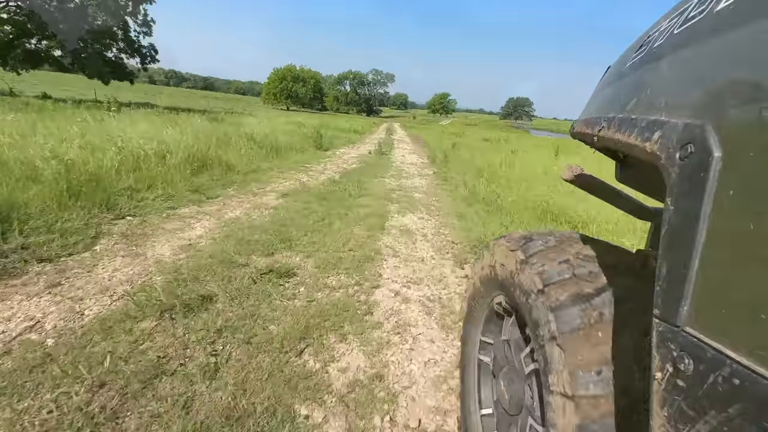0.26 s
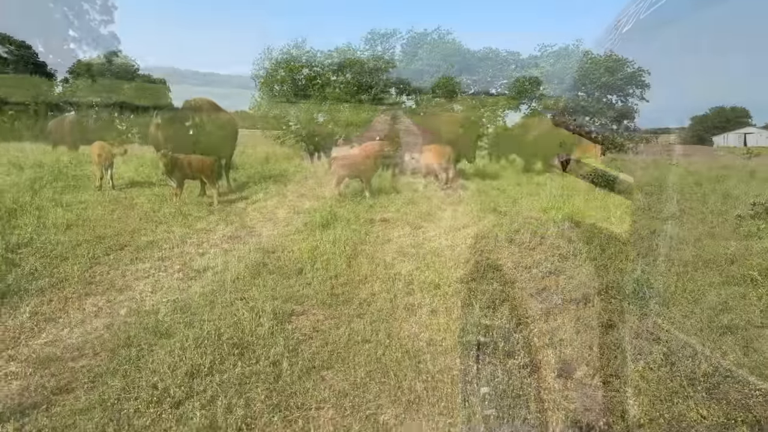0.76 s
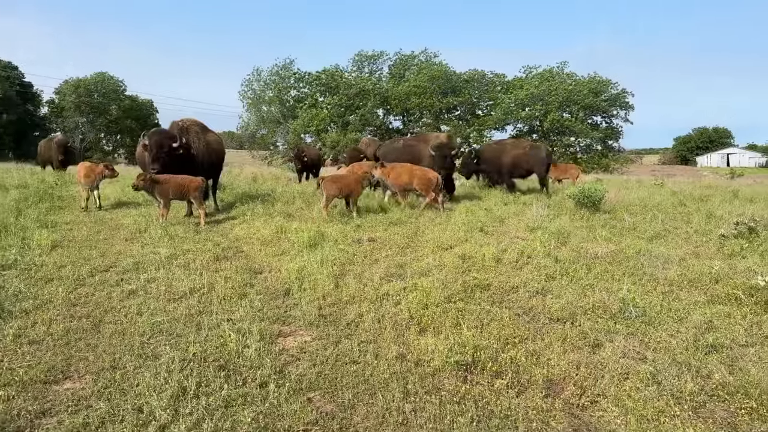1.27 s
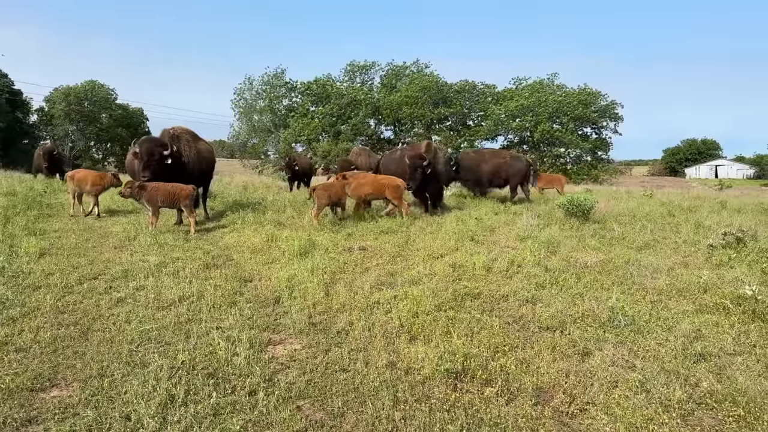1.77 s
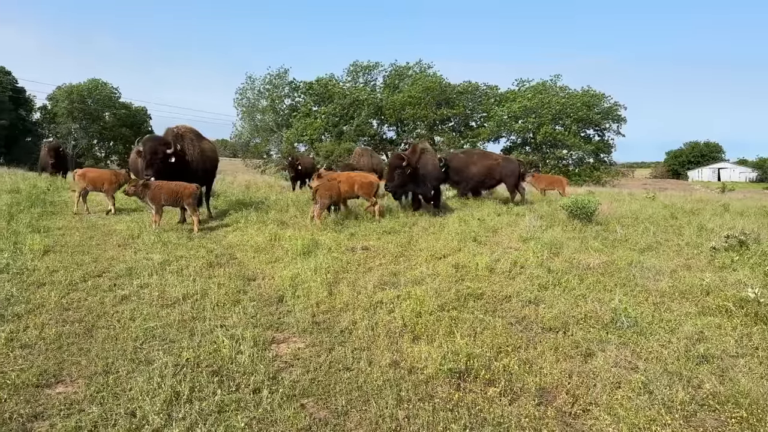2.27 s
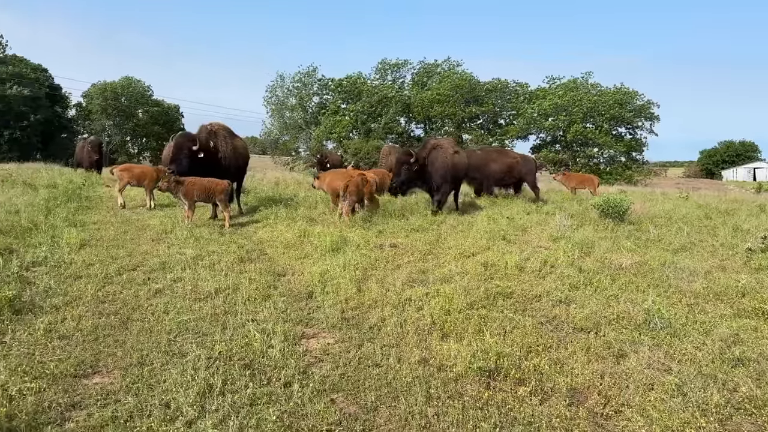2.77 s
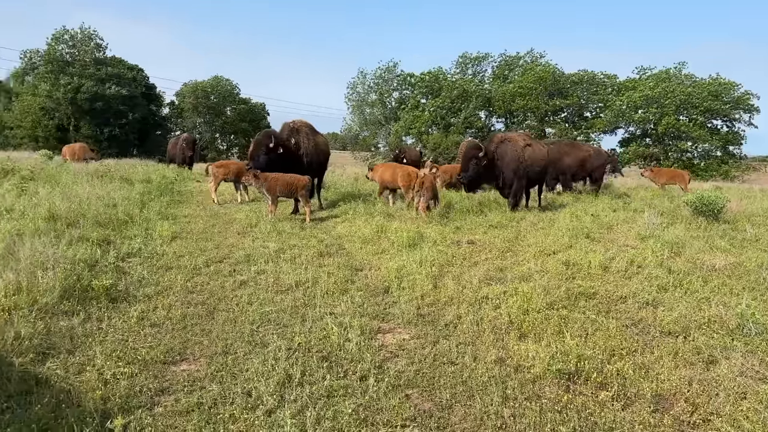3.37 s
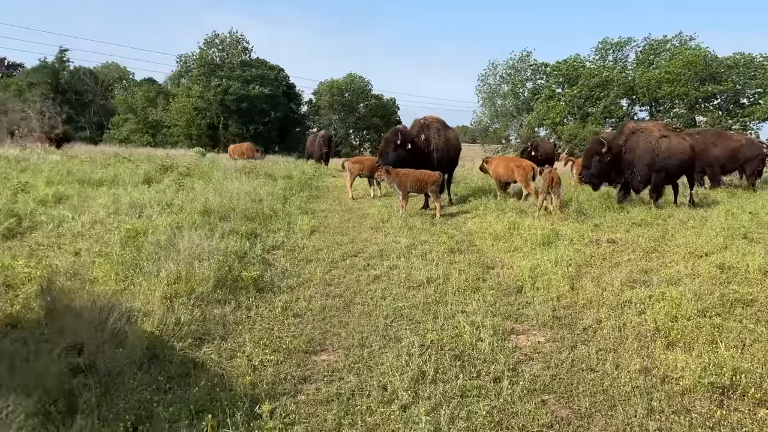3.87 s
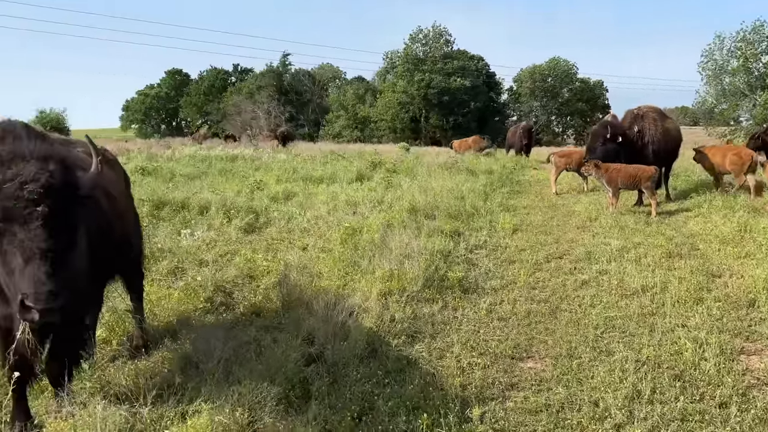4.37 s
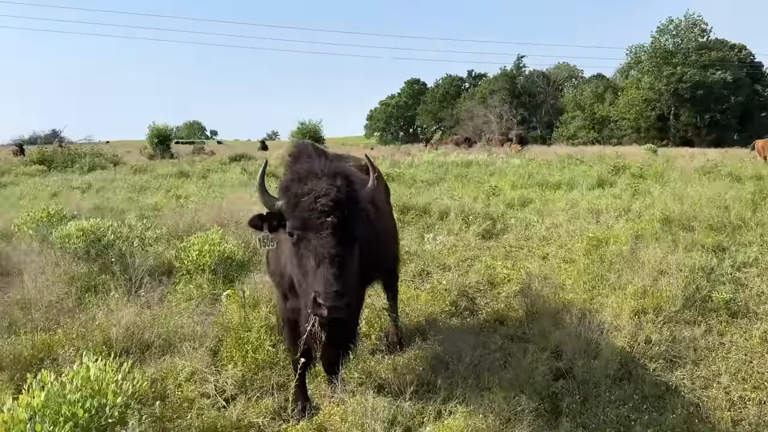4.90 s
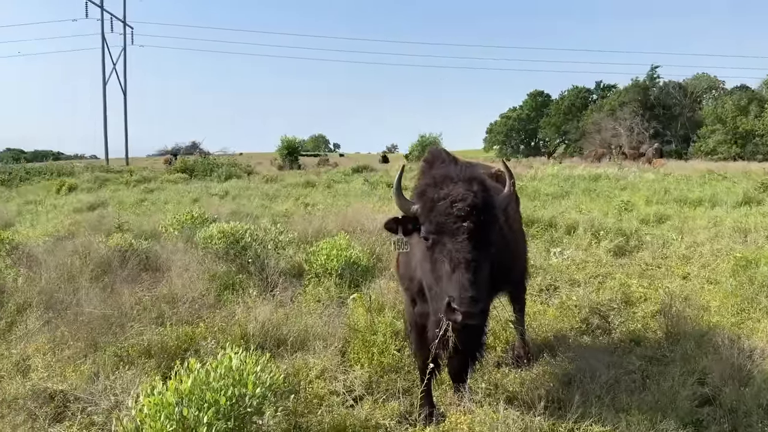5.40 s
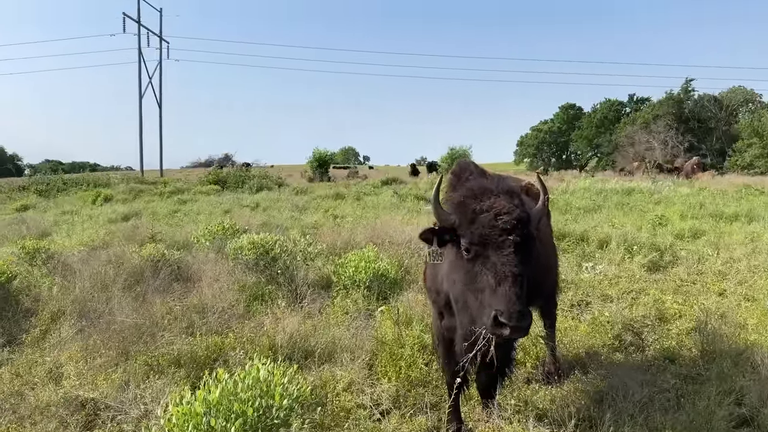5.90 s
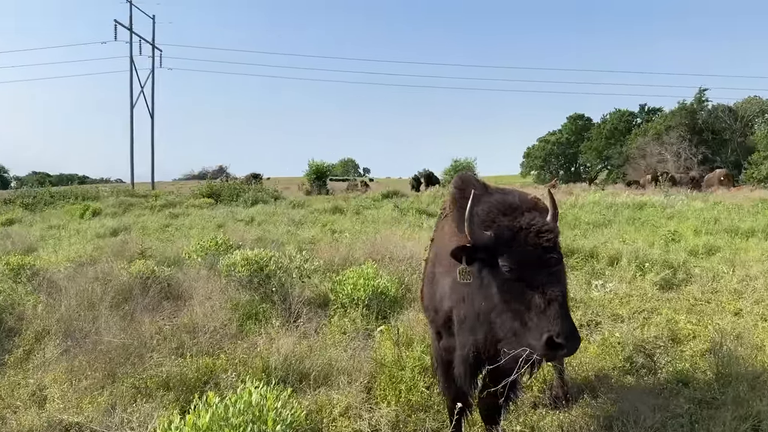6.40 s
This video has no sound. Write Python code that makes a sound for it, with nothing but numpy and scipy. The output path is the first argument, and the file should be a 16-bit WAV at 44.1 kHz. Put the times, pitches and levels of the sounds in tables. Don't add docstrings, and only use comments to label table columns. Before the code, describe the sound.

A small off-road vehicle rattles along in buffeting wind, fades within a second, then bison give low pulsing grunts close by in a quiet pasture.

```python
import sys
import numpy as np
from scipy import signal
from scipy.fft import rfft, irfft, next_fast_len
from scipy.io import wavfile
from scipy.ndimage import uniform_filter1d

SR = 44100
rng = np.random.default_rng(int(sys.argv[2]) if len(sys.argv) > 2 else 0)


def digitize_waveform(pressure):
    field = np.atleast_2d(pressure).T
    bounded = np.clip(field, -1, 1)
    quanta = np.round(bounded * 32767).astype(np.int16)
    wavfile.write(sys.argv[1], SR, quanta)


def nominal_scale(level):
    x = np.asarray(level, float) / 20
    return 10 ** x


N = 293265


def unit(x):
    return x / np.sqrt(np.mean(x ** 2) + 1e-20)


def span(rows):
    s, *columns = np.transpose(rows)
    first = round(s[0] * SR)
    t = np.arange(first, min(N, round(s[-1] * SR))) / SR
    return first, [np.interp(t, s, c) for c in columns]


def at_hz(points, hz):
    table_hz, values = np.array(points).T
    return np.interp(np.log(hz), np.log(table_hz), values)


def add(out, start, x):
    out[..., start:start + x.shape[-1]] += x[..., :N - start]


def drift(rate, size):
    knots_hz = 200
    knots = rng.standard_normal(int(size / SR * knots_hz) + 400)
    r = np.exp(-2 * np.pi * rate / knots_hz)
    slow = unit(signal.lfilter([1], [1, -2 * r, r * r], knots)[300:])
    return np.interp(np.arange(size) * knots_hz / SR, np.arange(len(slow)), slow)


def colour(source, spectrum, patchy_db, rate):
    size = source.shape[-1]
    fft_size = next_fast_len(size)
    hz = np.fft.rfftfreq(fft_size, 1 / SR) + 1e-3
    shaped = rfft(source, fft_size) * nominal_scale(at_hz(spectrum, hz))
    out, together = 0, drift(rate, size)
    for centre in np.arange(4, 15.):
        share = np.clip(1 - np.abs(np.log2(hz) - centre), 0, 1)
        flicker = nominal_scale(patchy_db * (.6 * together + drift(rate, size)))
        out = out + flicker * irfft(shaped * share, fft_size)[..., :size]
    return unit(out)


def pair(alike, size, pan=((100, 0), (200, 0))):
    fft_size = next_fast_len(size)
    hz = np.fft.rfftfreq(fft_size, 1 / SR) + 1e-3
    mid, side = rfft(rng.standard_normal((2, fft_size)))
    c = np.clip(at_hz(alike, hz), -1, 1)
    sign = np.array([[1], [-1]])
    both = np.sqrt(1 + c) * mid + np.sqrt(1 - c) * side * sign
    both = both * nominal_scale(sign * at_hz(pan, hz) / 2)
    return unit(irfft(both, fft_size)[:, :size])


def resonance(x, hz, width):
    r = np.exp(-np.pi * width / SR)
    top = np.array([1, 0, -1]) * (1 - r * r) / 2
    return signal.lfilter(top, [1, -2 * r * np.cos(2 * np.pi * hz / SR), r * r], x)


def swells(rows, rest_db, t):
    swell_db = 12
    power = nominal_scale(2 * rest_db)
    for s, peak_db, *sides_s in rows:
        away = np.maximum((s - t) / sides_s[0], (t - s) / sides_s[-1])
        power = power + nominal_scale(2 * (peak_db - swell_db * away))
    return 10 * np.log10(power)


def hush():
    # f/Hz, level/dB per Hz
    field = [(88, -47), (150, -9.5), (481, -4.5), (1130, -9), (1800, -20.5), (2810, -22), (3980, -26.5),
             (5130, -17), (5760, -30), (9360, -31), (11300, -58.5), (14300, -41), (15500, -52)]
    # f/Hz, likeness/-1 to 1
    field_alike = [(150, 1), (400, -0.23), (950, -0.12), (2400, -0.098), (6500, -0.25), (9000, -0.3),
                   (10500, 0.39)]
    # t/s, level about its mean/dB
    murmur = [(0, 2), (2.0, 0), (2.55, -1), (3.0, 2.5), (3.8, -1.5), (4.5, 3.5), (5.1, 1), (5.5, 0.5),
              (6.0, -8), (6.3, -1), (6.65, -2.5)]
    out = nominal_scale(-57) * colour(pair(field_alike, N), field, patchy_db=.8, rate=10)
    low = signal.sosfilt(signal.butter(1, 1500, fs=SR, output="sos"), out)
    murmur_db = np.interp(np.arange(N) / SR, *np.transpose(murmur))
    return out + (nominal_scale(murmur_db) - 1) * low


def stirring_grass():
    # t/s, peak/dB, swell/s, sink/s
    stirs = [(1.3, -67, 0.075, 0.31), (1.63, -74, 0.077, 0.08), (1.9, -69, 0.17, 0.088),
             (2.34, -68, 0.34, 0.082), (2.95, -73, 0.97, 0.072), (3.05, -61, 0.022, 0.028),
             (3.325, -57, 0.002, 0.021), (3.36, -71, .03, 0.16), (3.8, -71.5, 0.18, 0.2),
             (4.21, -64, 0.02, 0.52), (4.73, -57.5, 0.15, 0.093), (5.24, -67.5, 0.11, 0.059),
             (5.94, -73, 0.26, 0.11), (6.53, -69.5, 0.17, 0.18)]
    # f/Hz, level/dB per Hz
    grass = [(710, -53), (1200, -15), (1880, -3), (1980, -3), (2460, -5.5), (3250, -6.5), (6580, -5.5),
             (9470, -6), (11700, -21), (15500, -11)]
    # f/Hz, likeness/-1 to 1
    grass_alike = [(150, 1), (400, -0.23), (950, -0.12), (2400, -0.098), (6500, -0.25), (9000, -0.3),
                   (10500, 0.39)]
    out = np.zeros((2, N))
    start = round(0.9 * SR)
    stir_db = swells(stirs, -83.5, np.arange(start, N) / SR)
    size = len(stir_db)
    grain = nominal_scale(1.6 * np.minimum(rng.exponential(1, size), 5))
    rustle = colour(grain * pair(grass_alike, size), grass, patchy_db=1.2, rate=10)
    add(out, start, nominal_scale(stir_db + 8) * rustle)
    return out


def insects():
    # f/Hz, width/Hz, level/dB
    buzzes = [(4790, 230, -79), (5210, 130, -88)]
    # t/s, peak/dB, swell/s, sink/s
    songs = [
        [(1.55, -74, 0.53, 1), (2.9, -71.5, 0.66, .9), (5.6, -80, .6, .3)],
        [(2.1, -71.5, .15, 0.85), (3.7, -69, .15, 1.3), (5.3, -72.5, 0.56, 0.63), (5.8, -69, .15, 1.3)],
    ]
    out = np.zeros((2, N))
    for (hz, width, db), song in zip(buzzes, songs):
        hiss = rng.standard_normal((2, N))
        buzz = unit(resonance(resonance(hiss, hz, width), hz, width))
        out += buzz * nominal_scale(swells(song, db, np.arange(N) / SR) + 2.5 * drift(40, N))
    return out


def bird():
    # t/s, f/Hz, level/dB
    whistles = [
        [(2.55, 2300, -78), (2.60, 2780, -75), (2.65, 3070, -74)],
        [(4.835, 2690, -76), (4.86, 2960, -69), (4.91, 2820, -70.5), (4.98, 2915, -70)],
        [(5.295, 2420, -69), (5.32, 2750, -67), (5.342, 3100, -63.5), (5.37, 2680, -63), (5.40, 2370, -68)],
        [(5.56, 3220, -59), (5.58, 2960, -66.5), (5.60, 3080, -64), (5.63, 2820, -64), (5.67, 2600, -65),
         (5.72, 2654, -66), (5.76, 2640, -75)],
        [(5.818, 2490, -76), (5.83, 2830, -69), (5.845, 2920, -64), (5.88, 2510, -68.5), (5.925, 2010, -70),
         (5.95, 2050, -73)],
        [(6.255, 2770, -72), (6.28, 2880, -62.5), (6.305, 2760, -77), (6.35, 3050, -80)],
        [(6.345, 3220, -69), (6.39, 3260, -65), (6.41, 3340, -78)],
        [(6.50, 3120, -71), (6.54, 2950, -74), (6.60, 2680, -71)],
        [(5.86, 2810, -76), (5.93, 2650, -77), (5.99, 2600, -75)],
        [(6.595, 2300, -76), (6.615, 2490, -80), (6.65, 2470, -70)],
    ]
    out = np.zeros((2, N))
    for rows in whistles:
        start, (hz, db) = span(rows)
        size = len(hz)
        waver = 1 + .008 * drift(45, size)
        note = np.sin(2 * np.pi * np.cumsum(hz * waver) / SR) * signal.windows.tukey(size, .15)
        note = np.sqrt(2) * nominal_scale(db + 1.5 * drift(35, size)) * note
        trees = rng.standard_normal((2, 6000)) * nominal_scale(-31 - 60 * np.arange(6000) / SR / .3)
        add(out, start, note * nominal_scale([[1.2], [-1.2]]))
        add(out, start + 400, signal.fftconvolve(trees, note[None], axes=1))
    return out


def wind():
    # t/s, level/dB
    breeze = [(0.0, -27.5), (0.5, -34), (0.87, -43.5), (3.6, -53), (4.5, -37.5), (4.75, -43.5), (5.05, -48),
              (5.3, -52), (5.65, -57.5), (6.65, -42)]
    # t/s, peak/dB, swell and sink/s
    gusts = [(0.01, -20, 0.028), (0.46, -20, 0.027), (1.02, -35.5, 0.16), (1.17, -36, 0.044),
             (1.37, -32, 0.14), (1.57, -33.5, 0.019), (1.98, -30.5, 0.23), (2.15, -37, 0.015),
             (2.22, -30, 0.016), (2.40, -39.5, 0.41), (2.52, -36, 0.013), (2.74, -37.5, 0.19),
             (2.93, -28, 0.029), (3.02, -29.5, 0.061), (3.16, -31.5, 0.074), (3.22, -32, 0.015),
             (3.36, -40.5, 0.31), (3.69, -33, 0.098), (3.78, -29, 0.049), (3.93, -26.5, 0.062),
             (4.17, -28.5, 0.053), (4.69, -22.5, 0.012), (6.12, -47.5, 0.5), (6.37, -38.5, 0.091)]
    # f/Hz, level/dB per Hz
    buffet = [(14, -45), (25, 1.5), (44, -7.5), (67, 1.5), (110, -10), (166, -17.5), (260, -27.5),
              (400, -44), (600, -77)]
    _, (breeze_db,) = span(breeze)
    size = len(breeze_db)
    t = np.arange(size) / SR
    level_db = swells(gusts, breeze_db, t)
    alike = np.interp(t, [.5, 1.1], [0, .9])
    mid, side = colour(rng.standard_normal((2, size)), buffet, patchy_db=5.5, rate=13.0)
    swell = np.sqrt(uniform_filter1d(mid ** 2, size=2000) + 0.0068)
    lumps = mid + np.sqrt((1 - alike) / (1 + alike)) * side * [[1], [-1]]
    balance_db = (1 - alike) * np.array([[2.5], [-2.0]])
    out = np.zeros((2, N))
    add(out, 0, nominal_scale(level_db + balance_db) * lumps / swell)
    return out


def wind_slaps():
    # t/s, peak/dB, f/Hz, length/cycles, port/0 left 1 right
    eddies = [
        (0.008, -9, 75.5, 1.2, 1),
        (0.019, -9, 72, 1, 0),
        (0.118, -14, 190, 1.1, 0),
        (0.272, -14, 137, 1.7, 0),
        (0.324, -15, 150, 0.91, 0),
        (0.456, -13.5, 89, 1.3, 0),
        (0.508, -9.5, 184, 1.8, 0),
        (0.511, -12.5, 320, 1.5, 0),
        (0.521, -15, 80, 1.2, 1),
    ]
    pull = 0.31
    lead = 400
    out = np.zeros((2, N))
    t = np.arange(-lead, 1400) / SR
    for s, peak_db, hz, cycles, port in eddies:
        fade = np.exp(-(2 * hz * t / cycles) ** 2 / np.where(t < 0, 1, 2))
        swing = np.sin(2 * np.pi * hz * t) * fade
        first = round(s * SR) - lead
        sides = np.where(np.arange(2) == round(port), 1, -pull)[:, None]
        add(out, max(first, 0), sides * nominal_scale(peak_db) * swing[max(-first, 0):])
    return out


def engine():
    # t/s, level/dB
    drive = [(0.0, -27), (0.45, -29), (0.70, -32.5), (0.88, -39), (1.0, -46), (1.08, -53.5), (1.15, -62.5),
             (1.22, -88)]
    # multiple of the turning rate, level/dB
    exhaust = [(2, -9), (4, -13), (6, -20), (8, -21), (9, -20), (15, -27), (17, -27), (18, -25), (19, -25),
               (20, -26), (21, -26), (27, -24), (28, -24), (30, -23), (37, -25), (39, -24), (42, -23)]
    # f/Hz, level/dB per Hz
    roar_spectrum = [(30, -61), (80, -25), (123, -1), (162, -7.5), (359, -8), (562, -11.5), (1080, -9.5),
                     (1690, -8.5), (1800, -15), (2570, -14.5), (3220, -19.5), (6480, -27.5), (9800, -34.5),
                     (11200, -49.5), (15500, -48)]
    # f/Hz, likeness/-1 to 1
    roar_alike = [(60, 0.54), (180, 0.36), (550, 0.23), (1650, 0.71), (4970, 0.15), (15000, 0.52)]
    # f/Hz, left minus right/dB
    roar_pan = [(60, -9), (150, 8), (380, -1.5), (950, -1), (2380, 5), (5980, 13), (15000, -3)]
    firing_hz = 39.75
    start, (level_db,) = span(drive)
    size = len(level_db)
    turn = np.cumsum(firing_hz * (1 + 0.00186 * drift(2.29, size))) / SR
    firing = unit(np.diff(np.floor(turn), prepend=0) * nominal_scale(0.4 * drift(30, size)))
    gate = 1 + 0.039 * np.cos(4 * np.pi * turn)
    roar = gate * pair(roar_alike, size, roar_pan) + 0.18 * resonance(firing, 1220, 1300)
    body = colour(roar, roar_spectrum, patchy_db=1.0, rate=8.4) * nominal_scale(4.5)
    orders = 0
    for k, db in exhaust:
        strength = nominal_scale(db + 11.5 + 2.3 * drift(4.9, size))
        wobble = 0.0024 * k * drift(5.2, size)
        side_shift = rng.random((2, 1)) * 0.34
        cycles = k * turn + rng.random() + wobble + side_shift
        orders = orders + strength * np.sin(2 * np.pi * cycles)
    out = np.zeros((2, N))
    add(out, start, nominal_scale(level_db) * (body + orders))
    return out


def squeaks():
    # t/s, length/s, low partial/dB, octave partial/dB
    rubs = [(0.0, 0.012, -30, -45), (0.093, .015, -47, -41), (0.122, 0.018, -24.5, -36),
            (0.383, 0.035, -36, -38.5), (0.419, 0.032, -55, -30.5), (0.45, 0.052, -32.5, -38),
            (0.702, 0.032, -64, -39.5), (0.752, 0.032, -36, -48), (0.787, 0.045, -37.5, -58),
            (1.007, 0.026, -40.5, -67), (1.078, 0.033, -60.5, -78)]
    squeak_hz = 3240
    sides = nominal_scale([[3.5], [-4.5]])
    out = np.zeros((2, N))
    for s, length, low_db, high_db in rubs:
        rub = rng.standard_normal(4000)[:round(length * SR)]
        low, high = [unit(resonance(resonance(rub, hz, 130), hz, 130)) for hz in (squeak_hz, 2 * squeak_hz)]
        squeak = (nominal_scale(low_db) * low + nominal_scale(high_db) * high) * np.hanning(len(rub)) ** .5
        add(out, round(s * SR), squeak * sides)
    chirp = unit(resonance(resonance(rng.standard_normal(2200), 7850, 630), 7400, 630))
    add(out, round(0.015 * SR), nominal_scale(-34.5) * chirp * np.hanning(2200) * sides)
    return out


def vehicle():
    # f/Hz, width/Hz, depth/0-1
    mount_dips = [(2560, 330, 0.8), (5200, 260, 1), (7400, 82, 0.7)]
    out = engine() + squeaks()
    for hz, width, depth in mount_dips:
        out = out - depth * resonance(out, hz, width)
    return out


def knocks():
    # t/s, peak/dB, f/Hz, time to die away/s
    hits = [
        (0.034, -14, 1500, .01),
        (2.335, -39, 400, .05),
        (4.253, -27, 210, .07),
        (4.287, -35, 170, .05),
        (4.598, -28, 380, .03),
        (4.603, -25, 300, .04),
        (5.165, -52, 850, .02),
        (5.215, -49, 450, .03),
        (5.838, -42, 450, .008),
        (6.348, -42, 1100, .006),
    ]
    out = np.zeros((2, N))
    t = np.arange(4000) / SR
    for s, peak_db, hz, t60 in hits:
        push = ((t == 0) + .15 * rng.standard_normal(len(t))) * nominal_scale(-120 * t / t60)
        knock = resonance(push, hz, 5 / t60)
        knock = resonance(resonance(knock, hz, hz * .8), hz, hz * 1.5)
        add(out, round(s * SR), nominal_scale(peak_db) * knock / np.abs(knock).max())
    return out


def tearing_grass():
    # t/s, length/s, level/dB, centre f/Hz, width/share of the centre
    clumps = [(0.289, 0.014, -32.5, 6650, 0.63), (2.299, 0.05, -57.5, 1710, 0.28),
              (2.696, 0.013, -56, 1270, 0.66), (2.702, 0.045, -59, 1990, 0.85),
              (2.924, 0.031, -62, 2180, 0.41), (3.034, 0.028, -48.5, 1640, 0.6),
              (3.082, 0.019, -64, 1298, .7), (3.319, 0.019, -60, 3480, 0.58),
              (3.374, 0.037, -55.5, 2460, 0.8), (4.119, 0.094, -60.5, 3360, 0.54),
              (4.215, 0.012, -60, 8000, 1), (4.556, .01, -58.5, 8000, 0.64),
              (5.232, 0.066, -65, 5270, 0.94)]
    out = np.zeros((2, N))
    for s, length, level_db, hz, width in clumps:
        snaps = rng.standard_normal((3, 6000)) * nominal_scale(2.2 * rng.exponential(1, 6000))
        snaps = snaps[:, :round(length * SR)]
        snaps = snaps[0] + .8 * snaps[1:]
        size = snaps.shape[1]
        shape = np.linspace(1.4, 0, size) if length < .025 else np.hanning(size) ** .5
        tear = resonance(resonance(snaps, hz, hz * width), hz, hz * width * 3.5) + .06 * snaps
        add(out, round(s * SR), nominal_scale(level_db) * unit(tear) * shape)
    return out


def rasps():
    # t/s, length/s, level/dB, centre f/Hz, width/Hz
    breaths = [
        (1.86, .09, -63, 2200, 400),
        (1.88, .12, -60, 1450, 250),
        (1.87, .12, -54, 1020, 150),
        (1.88, .10, -47, 520, 250),
        (4.36, .18, -65, 1900, 400),
        (4.75, .08, -64, 2520, 200),
    ]
    out = np.zeros((2, N))
    for s, length, level_db, hz, width in breaths:
        air = rng.standard_normal((3, 9000))[:, :round(length * SR)]
        air = air[0] + .5 * air[1:]
        air = resonance(resonance(air, hz, width), hz, 2 * width)
        add(out, round(s * SR), nominal_scale(level_db) * unit(air) * np.hanning(air.shape[1]))
    return out


def grunt(rows, throat, size_ratio, rough, breath):
    start, (pulse_hz, level_db, opening) = span(rows)
    progress = np.linspace(0, 1, len(pulse_hz))
    octaves = np.log2(pulse_hz / pulse_hz.mean())
    stretch = size_ratio + 0.21 * octaves - 0.09 * progress ** 4
    ragged = np.clip(rough * (1 + 0.99 * (progress - .5)), 0, 1)
    air = breath[0] + (breath[1] - breath[0]) * progress ** 2
    out = np.zeros(len(pulse_hz) + 4000)
    cycles = np.cumsum(pulse_hz) / SR
    slap_at = np.flatnonzero(np.diff(np.floor(cycles), prepend=-1))
    t = np.arange(3000) / SR
    hz, width, db = np.transpose(throat)[:, :, None]
    low = hz < 800
    build_up = np.where(low, np.minimum(1.6 * hz, 600), 1100)
    attack = (1 - np.exp(-build_up * t)) ** 2
    chances = rng.standard_normal((40, 2, len(throat), 1))
    puffs = rng.standard_normal((40, 800))
    for i, chance, puff in zip(slap_at, chances, puffs):
        throat_shift = stretch[i] * (1 + .08 * ragged[i] * chance[0])
        moved_hz = hz * np.where(low, throat_shift, 1 + .008 * chance[0])
        modes = np.sin(2 * np.pi * moved_hz * t) * np.exp(-np.pi * width * t)
        uneven_db = np.where(low, 6.5 * ragged[i], 1.5) * chance[1]
        gains = nominal_scale(db + opening[i] * np.log2(hz / hz[0]) + uneven_db)
        rings = gains * modes * attack
        ring, nose = np.sum(rings * low, axis=0), np.sum(rings * ~low, axis=0)
        blown = signal.fftconvolve(nose, puff * np.exp(-t[:800] / .008))[:len(t)] * .075
        airy = signal.fftconvolve(ring, puff * np.exp(-t[:800] / .007))[:len(t)] * .14 * ragged[i]
        late = round(abs(chance[0, 0, 0]) * ragged[i] * 0.1023 * SR / pulse_hz[i])
        voice = ring + airy + (1 - air[i]) * nose + air[i] * blown
        out[i + late:i + late + len(t)] += nominal_scale(level_db[i] + 11.5) * voice
    return start, out


def bison():
    # t/s, slaps of the folds/Hz, level/dB, mouth opening/dB per octave
    calls = [
        [(0.772, 36.9, -34, -14), (0.90, 38.34, -40.5, -2), (1.06, 35.35, -45.5, 1)],
        [(1.11, 50.1, -45.5, -9), (1.21, 50.96, -43, -10.5), (1.27, 51.55, -46.5, 1), (1.41, 51.45, -43, -.5),
         (1.50, 48, -70, 4)],
        [(1.70, 36.96, -44.5, 0.5), (1.815, 43.74, -39.5, 1.5), (1.87, 49.6, -38, 2.5),
         (1.955, 38.2, -35, -3.5)],
        [(1.967, 29.57, -30, 6.5), (2.05, 33.05, -34.5, 2.5), (2.14, 28.75, -38.5, 7)],
        [(2.726, 54, -38.5, 2), (2.79, 55.56, -34, -0.5), (2.85, 55.7, -32, -1), (2.93, 52.2, -35.5, 0.5),
         (3.01, 50, -41, -8)],
        [(4.331, 37.4, -43, 1), (4.425, 47.3, -38, -1.5), (4.51, 35.9, -36, -1), (4.56, 37.8, -49, 0)],
        [(4.564, 58.8, -38.5, -2.5), (4.62, 59.4, -37.5, -0.5), (4.67, 60.5, -34, -2.5),
         (4.74, 55.4, -46.5, 1.5), (4.79, 54.2, -53.5, 3), (4.82, 52.4, -62, 0.5)],
        [(6.15, 26.77, -64, 5), (6.25, 27.9, -54, 6), (6.34, 29.55, -47.5, 4), (6.47, 27, -44, 4.5),
         (6.62, 25.9, -69, -6)],
        [(1.28, 50.2, -51, 0), (1.36, 51.4, -39, 0), (1.47, 49.14, -45.5, 0)],
        [(5.55, 33.2, -56.5, -6), (5.68, 34.7, -64, 0), (5.80, 31, -69, -4)],
        [(6.575, 40.1, -61, 2), (6.645, 42, -54, 1)],
    ]
    # f/Hz, width/Hz, level/dB
    throats = [
        [(221.5, 45, 0.5), (347, 96, 9)],
        [(166, 43, 7), (397, 41, -1.5), (730, 160, -6)],
        [(182.6, 37.6, 8), (373, 156, 8.5), (530, 290, -4)],
        [(188, 21, -6), (348, 129, 5.5), (546, 140, -18)],
        [(168.3, 37, -2.5), (291, 120, -4), (388, 120, -9.5)],
        [(252, 69, 5.5), (351, 84, 6), (617, 55, -12)],
        [(171.5, 47, 6.5), (281, 106, 11), (410, 210, 10.5), (610, 89, -4)],
        [(133, 50, 11), (257, 118, 9), (339, 32, -20.5)],
        [(99, 13.8, 6)],
        [(220, 78, 7), (340, 52, 1.5)],
        [(238, 70, 4), (410, 71, 3)],
    ]
    # f/Hz, width/Hz, level/dB
    noses = [
        [],
        [(1470, 41, -29), (1900, 68, -21.5), (2300, 76, -22), (2600, 75, -22), (3000, 100, -25),
         (3440, 115, -17)],
        [(2080, 130, -37), (2380, 130, -35), (850, 260, -16), (1140, 65, -15), (1500, 90, -32)],
        [(1040, 120, -38), (1560, 300, -30)],
        [(930, 90, -25), (2020, 130, -29), (2360, 100, -27), (3390, 110, -30)],
        [(1080, 140, -15), (1640, 140, -15.5), (2010, 130, -19)],
        [(1080, 125, -13.5), (2050, 70, -17), (2440, 85, -11.5), (2680, 90, -24), (3040, 70, -28)],
        [(870, 120, -21.5), (1840, 175, -30.5)],
        [],
        [],
        [],
    ]
    # throat stretch/ratio, raggedness/0-1, left minus right/dB
    animals = [(0.966, 0.82, -1), (0.962, 0.21, 0), (1.036, 0.22, -0.2), (0.94, 0.2, 0.5),
               (0.942, 0.06, -2.5), (0.965, 0.36, -1), (0.897, 0.26, 3), (0.804, 0.5, -1.5),
               (0.94, 0.26, -0.5), (1, 0.63, -1), (0.85, 0.58, 0)]
    breaths = [(.5, .5), (.9, .9), (0, .7), (.9, .7), (.2, .6), (.7, .7), (.1, .2), (.8, .8), (0, 0),
               (.8, .8), (.8, .8)]
    out = np.zeros((2, N))
    for rows, throat, nose, animal, breath in zip(calls, throats, noses, animals, breaths):
        size_ratio, rough, pan_db = animal
        start, voice = grunt(rows, throat + nose, size_ratio, rough, breath)
        echo = signal.lfilter([.25], [1, -.75], voice)
        add(out, start, voice * nominal_scale([[pan_db / 2], [-pan_db / 2]]))
        add(out, start + round(0.00645 * SR), nominal_scale(-25.5) * echo)
        scatter = rng.standard_normal((2, 5000)) * nominal_scale(-33 - 60 * np.arange(5000) / SR / 0.067)
        add(out, start + 200, signal.fftconvolve(scatter, voice[None], axes=1))
    return out


def scene():
    pasture = hush() + stirring_grass() + insects() + bird()
    air = wind() + wind_slaps()
    herd = knocks() + tearing_grass() + rasps() + bison()
    return pasture + air + vehicle() + herd


def top_cut(x):
    return signal.sosfilt(signal.butter(12, 15690, fs=SR, output="sos"), x)


def record(dry):
    x = signal.sosfilt(signal.butter(3, 38, "high", fs=SR, output="sos"), dry)
    return top_cut(x)


dry = scene()
out = record(dry)
digitize_waveform(out)
```